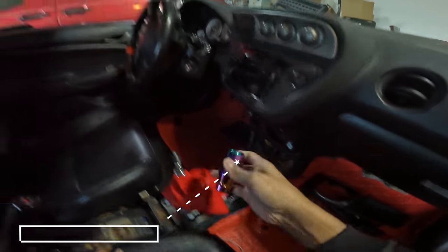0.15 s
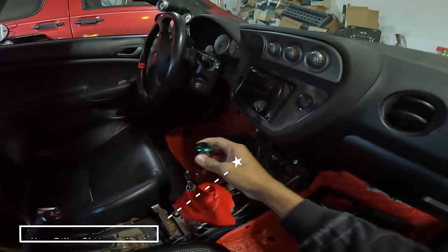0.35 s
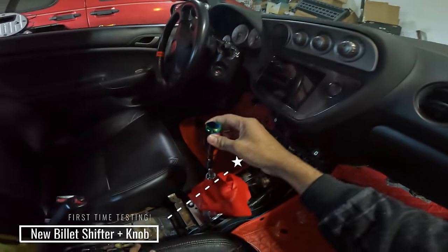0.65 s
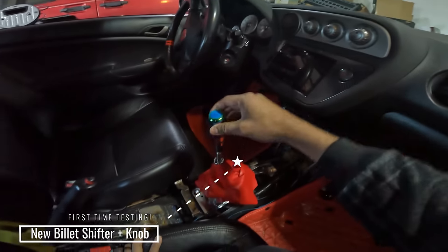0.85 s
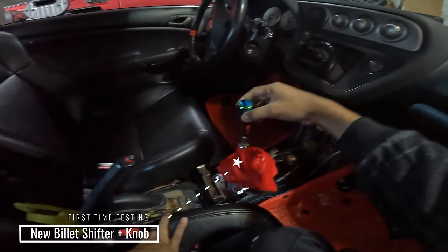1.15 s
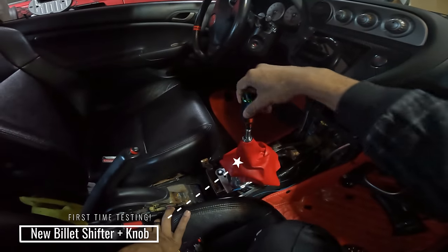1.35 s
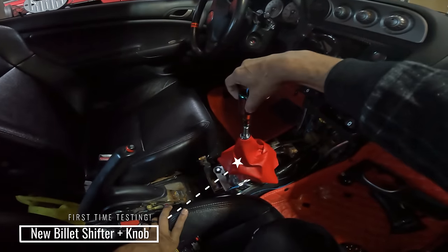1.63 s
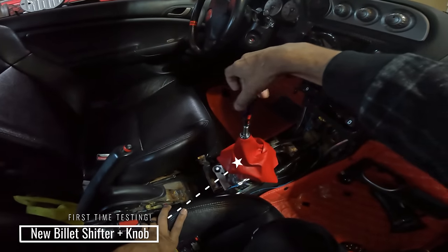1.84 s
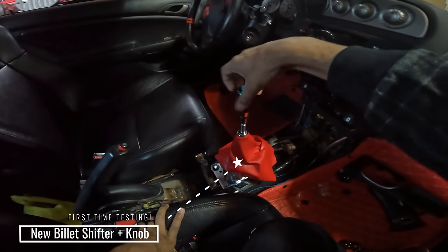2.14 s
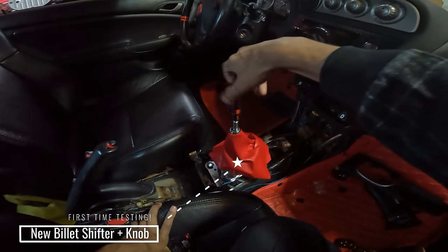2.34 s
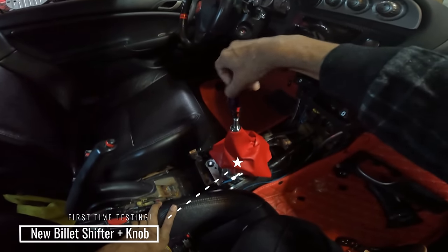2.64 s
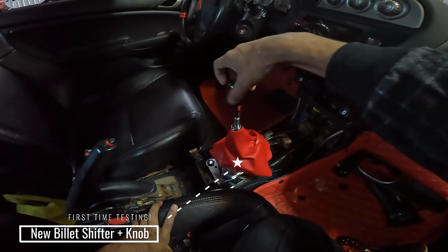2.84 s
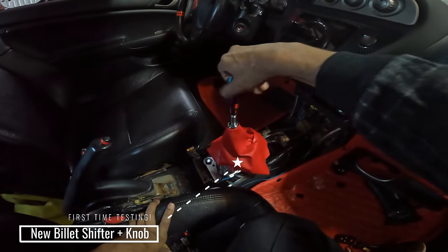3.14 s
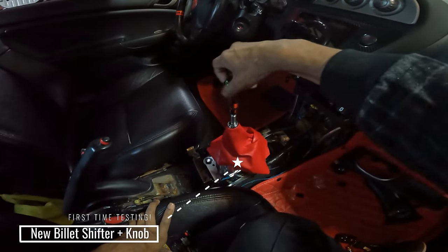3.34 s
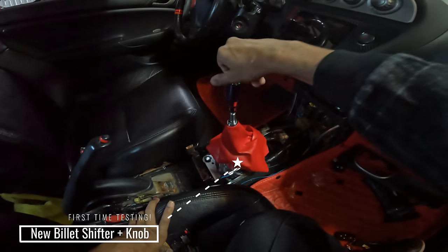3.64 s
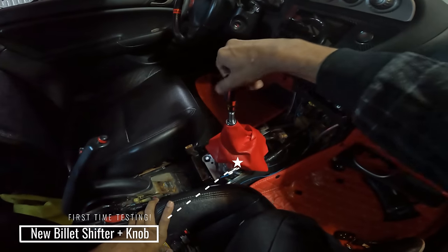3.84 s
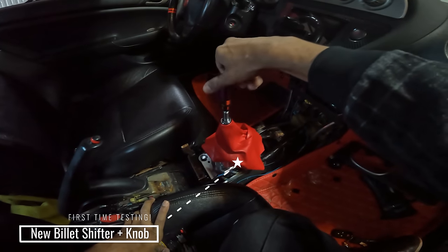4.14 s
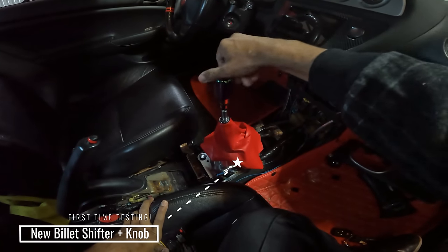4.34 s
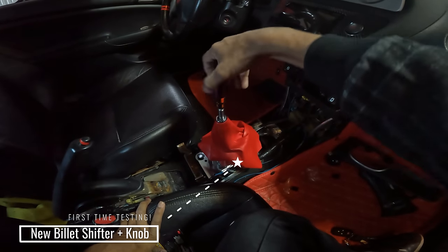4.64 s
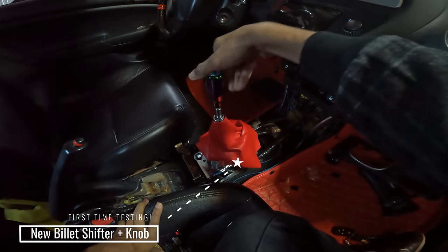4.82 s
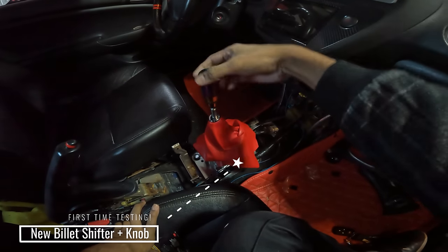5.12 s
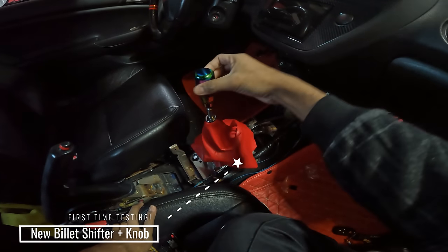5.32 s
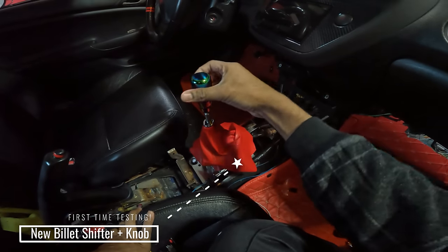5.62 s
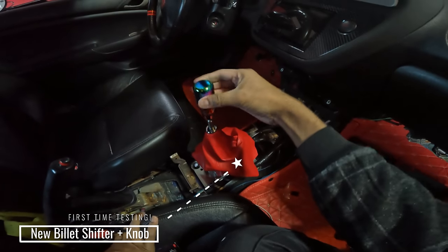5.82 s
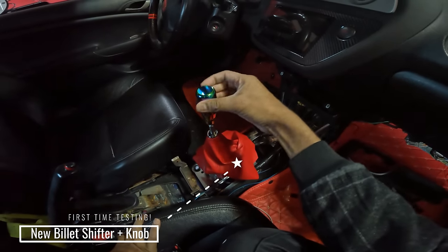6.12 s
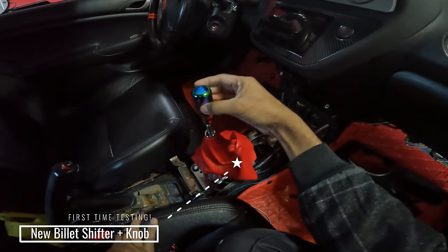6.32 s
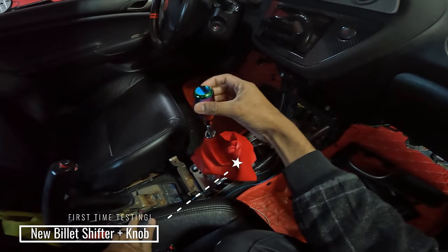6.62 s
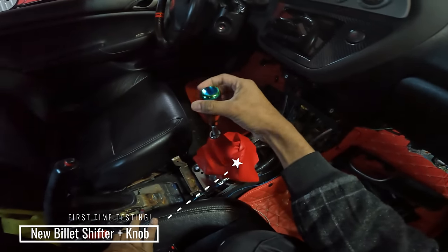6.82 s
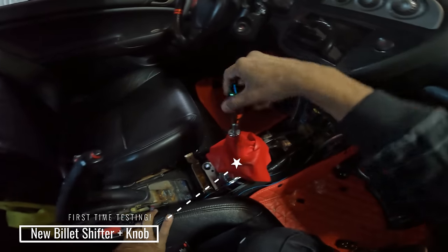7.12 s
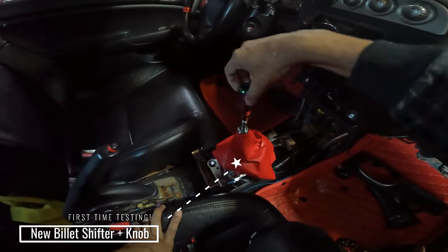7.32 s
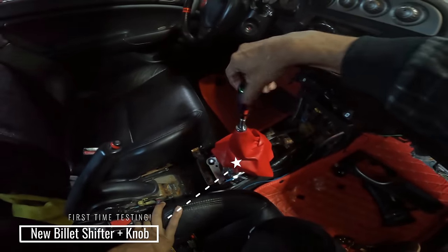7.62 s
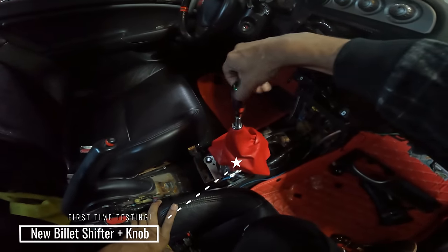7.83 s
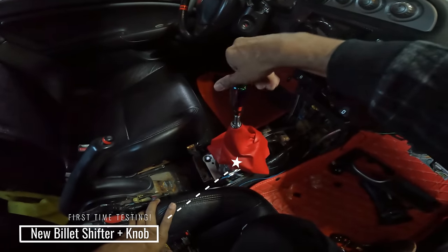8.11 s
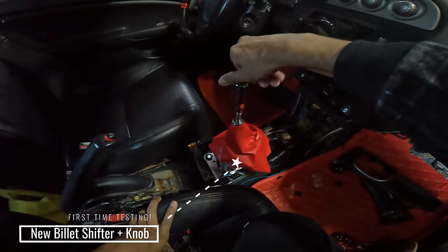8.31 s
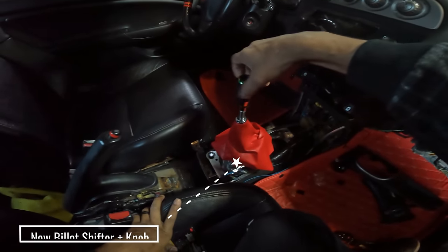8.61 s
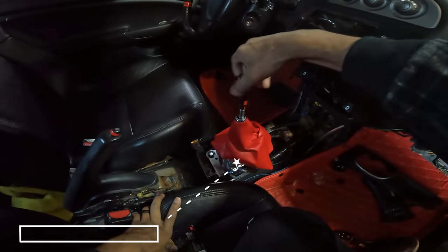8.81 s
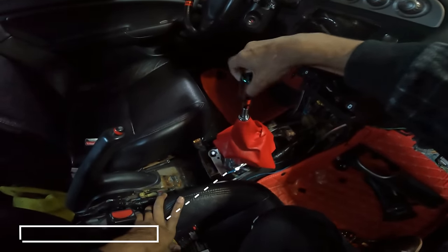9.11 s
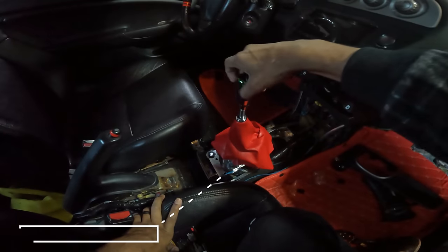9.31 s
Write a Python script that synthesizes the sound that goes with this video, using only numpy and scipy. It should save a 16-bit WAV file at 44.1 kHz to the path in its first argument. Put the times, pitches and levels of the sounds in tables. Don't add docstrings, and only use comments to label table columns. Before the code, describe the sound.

Close stereo pickup in a stripped car cabin, with soft low rumble, fluttering panel hum and steady hiss throughout. From 0.05 to 0.47 s a plastic case creaks under a finger at the far right, with one sharp tick left at 0.2. Light metal clacks begin at 0.5. The two loudest knocks come at 0.9 and 1.1 s, booming in the floor pan with bright jingling linkage and ringing rods. From 1.5 to 3.7 the lever rocks gently: dull quiet thuds, dry bearing rubs, sleeve brushing on the left. From 3.95 to 4.6 the knocks firm up, damped by the palm; from 4.8 to 6.9 come irregular gate clacks, strongest near 5.15, with small ticks and leather creases. Around 7.0 to 7.4 it quietens to cloth rustle. From 7.5 to 9.3 steady thumps arrive about five per second, each with a faint high bushing squeak, then rumble remains.

```python
import sys
import numpy as np
from scipy import signal
from scipy.fft import rfft, irfft, next_fast_len
from scipy.io import wavfile
from scipy.ndimage import uniform_filter1d

SR = 44100
rng = np.random.default_rng(int(sys.argv[2]) if len(sys.argv) > 2 else 0)


def invert_db(x):
    u = np.asarray(x, float) / 20
    return 10 ** u


def transcribe(signal):
    frames = np.atleast_2d(signal).T
    limited = np.clip(frames, -1, 1)
    pcm = np.round(limited * 32767).astype(np.int16)
    wavfile.write(sys.argv[1], SR, pcm)


N = 417186
PORT_LAG = 10


def resonance(x, hz, width):
    return signal.lfilter(*signal.iirpeak(hz, hz / width, fs=SR), x)


def decay(t, t60):
    return np.exp(-np.log(1000) * t / t60)


def ring(modes, chance, t):
    hz, db, t60 = np.transpose(modes)[:, :, None]
    chance = chance[:len(modes), None]
    strength = invert_db(db + 4 * chance)
    partials = np.sin(2 * np.pi * hz * (1 + 0.016 * chance) * t)
    return (strength * partials * decay(t, t60)).sum(0)


def wash(bands, noise, t):
    y = 0
    for hz, width, db, t60 in bands:
        band = resonance(resonance(noise * decay(t, t60), hz, width), hz, width)
        y = y + invert_db(db) * band * np.sqrt(500 / width)
    return y / np.abs(y).max()


def walk(rate):
    k = int(SR / rate)
    held = np.repeat(rng.standard_normal(N // k + 1), k)
    return 1.3 * uniform_filter1d(uniform_filter1d(held, k), k)[:N]


def fibres(strokes, bands, pan_db=0):
    power = np.zeros(N)
    for s, length, db in strokes:
        stroke = power[int((s - length / 4) * SR):int((s + length * 1.4) * SR)]
        stroke += 2 * invert_db(2 * db) * np.hanning(len(stroke)) ** 2
    grains = rng.standard_normal((2, N)) * invert_db(3.8 * np.minimum(rng.exponential(size=N), 6))
    x = 0
    for hz, width, db in bands:
        band = resonance(grains, hz, width)
        band = resonance(resonance(band, hz, 1.5 * width), hz, 1.5 * width)
        x = x + invert_db(db) * band
    left = 1 / (1 + invert_db(-2 * pan_db))
    ports = np.sqrt(2 * np.array([[left], [1 - left]]))
    soft = uniform_filter1d(np.sqrt(power), int(0.0027 * SR)) * ports
    return x / x.std() * soft * invert_db(1.5 * walk(25))


def add(out, s, wave, db, pan_db=0, lag=0):
    wave = wave * invert_db(db) / np.abs(wave).max()
    for row, gain_db, late in zip(out, (pan_db / 2, -pan_db / 2), (lag, 0)):
        i = int(s * SR) + late
        n = min(len(wave), N - i)
        row[i:i + n] += wave[:n] * invert_db(gain_db)


PAN_HZ, TUNNEL_HZ = (133.2, 150.04), (365.6, 389.6)
# f/Hz, level/dB per Hz
CABIN = [(80, -8), (156, 6.5), (249, -6.5), (373, -9), (452, -28), (1800, -80), (2580, -33), (15000, -28.5)]
# f/Hz, side minus mid level/dB
CABIN_SIDE = [(100, -7), (300, -4.5), (700, 4), (15000, 0)]
# t/s, rumble level/dB
STIR = [(0, -53), (.78, -58.5), (1.1, -52.5), (1.6, -55), (1.9, -53), (2.9, -51), (3.4, -52), (4.6, -47.5),
        (4.9, -55), (5.1, -50.5), (5.9, -52), (6.6, -50.5), (7.0, -56.5), (7.3, -49.5), (7.7, -54),
        (8.25, -48.5), (8.7, -51.5), (9.46, -51)]
# f/Hz, width/Hz, level/dB
RUMBLE = [(27.4, 35, 3), (42.5, 21.7, 1), (65.1, 20.5, -5), (85.7, 16, -11)]
# f/Hz, width/Hz, level/dB, t60/s
SHELL = [(290, 45, 1.5, 0.31), (402, 330, 2, 0.11), (714, 500, 5.5, 0.022), (585, 280, -18.5, 0.61)]
# f/Hz, width/Hz, level/dB, t60/s
SHELL_MID = [(1290, 1460, -9, 0.022), (1440, 1900, -22.5, 0.015), (1215, 270, -37.5, 0.42)]


def cabin(knocks):
    t = np.arange(N) / SR
    rest = invert_db(-10 * uniform_filter1d(1. * (t > 7.0) * (t < 8.2), SR // 10))

    size = next_fast_len(N)
    hz = np.maximum(np.arange(size // 2 + 1) * SR / size, 1)
    colour, side = (np.interp(np.log(hz), np.log(np.array(p)[:, 0]), np.array(p)[:, 1])
                    for p in (CABIN, CABIN_SIDE))
    spectra = rfft(rng.standard_normal((2, size))) * invert_db(np.array([colour, colour + side]))
    mid, dif = irfft(spectra, size)[:, :N]
    hiss = invert_db(-64.5 + .5 * walk(3.3)) * np.array([mid + dif, mid - dif]) / mid.std()
    lows = signal.sosfilt(signal.butter(2, 450, fs=SR, output="sos"), hiss)
    hiss = hiss + (rest - 1) * lows

    air, shake = rng.standard_normal((2, 3, N))
    air = air[0] + 0.25 * air[1:]
    air = sum(invert_db(g) * resonance(resonance(air, f, w), f, w) for f, w, g in RUMBLE)
    rumble_db = np.interp(t, *np.transpose(STIR)) + 1.4 * walk(11)
    rumble = air / air.std() * invert_db(rumble_db + np.array([[.8], [-.8]]))

    pan = invert_db(10.0) * resonance(shake[0], PAN_HZ[1], 33.0)
    tunnel = invert_db(4.0) * resonance(shake[0], TUNNEL_HZ[0], 5.5)
    panels = rest * (pan + tunnel)
    shell = sum(invert_db(g - 18.0) * resonance(shake[1:], f, w) for f, w, g, _ in SHELL + SHELL_MID)
    tremble = shell + np.array([np.roll(panels, PORT_LAG) * invert_db(-1.5), panels])
    span = int(0.06 * SR)
    work = uniform_filter1d(uniform_filter1d(np.abs(knocks[0]), span), span)
    effort = (np.abs(work) / invert_db(-41.0) + 0.8) ** 0.55
    flutter = invert_db(1.8 * walk(14))
    return hiss + rumble + tremble * invert_db(-66 + 19) * effort * flutter


# t/s, peak level/dB, main ring f/Hz
CREAKS = [(0.066, -53.5, 2560), (0.11, -48, 2740), (0.149, -56, 2580), (0.2762, -41, 2530),
          (0.288, -42, 2440), (0.316, -48.5, 2480), (0.3611, -36.5, 2350), (0.3702, -32, 2350),
          (0.3777, -33, 2260), (0.3889, -34, 2350), (0.4384, -31, 2240), (0.4457, -30.5, 2370),
          (0.4508, -52, 2350), (0.453, -31.5, 2320), (0.4664, -37, 2400)]
# f/Hz, level/dB, t60/s
CASE = [(1610, 4, 0.0088), (2160, 11.5, 0.0062), (2350, 20, 0.0042), (3320, 7.5, 0.0049),
        (5440, 13.5, 0.0013), (229, 0.5, 0.012)]


def creaks():
    out, t = np.zeros((2, N)), np.arange(SR // 30) / SR
    pan_db = -53
    for (s, db, hz), c in zip(CREAKS, rng.standard_normal((len(CREAKS), len(CASE)))):
        case = [(hz if k == 2 else f, g, t60) for k, (f, g, t60) in enumerate(CASE)]
        slip = -ring(case, 0.14 * c, t) * (1 - np.exp(-t / 0.0029))
        slip = slip - 0.13 * resonance(slip, 1980, 87)
        add(out, s, slip, db + 7.5 + pan_db / 2, pan_db)
    return out


RATTLE_S, SCRAPE_S = 0.0044, 0.011
LIGHT_TREBLE_DB, GRIPPED_TREBLE_DB = -12, -8
# t/s, peak level/dB, rods re peak/dB
SCRAPED_CLACKS = [(0.07, -55.5, -6), (0.19, -64, 10), (2.15, -66, -16), (3.45, -67, -6), (5.2, -60, -3),
                  (7.62, -62, -19), (8.143, -49.5, -11), (8.333, -55, -23), (8.558, -53, -9),
                  (8.81, -55.5, -13), (8.978, -58, -18.5), (9.264, -52.5, -0.5)]
# t/s, peak level/dB, rods re peak/dB
LIGHT_CLACKS = [(0.518, -45, -14), (0.536, -54.5, 10.5), (0.582, -43.5, -34), (0.637, -53.5, 7),
                (0.682, -51, -5), (0.8997, -31, 0.5), (1.072, -48.5, 12), (1.086, -38.5, -8),
                (1.107, -37, 6.5), (1.1145, -31, 7), (1.783, -65, 9), (1.821, -56, 6.5), (2.06, -54.5, -20),
                (2.104, -50, -24), (2.36, -54.5, -2), (2.553, -54.5, -14), (2.778, -56, 8),
                (2.942, -62, -17), (3.04, -58.5, -7.5), (3.235, -55.5, -14), (3.651, -61, -13),
                (1.985, -58, -19), (2.71, -58, -8), (3.12, -62, -16), (3.42, -62, -10)]
# t/s, peak level/dB, rods re peak/dB
GRIPPED_CLACKS = [(3.954, -47, -30), (3.983, -45.5, -24), (4.182, -53.5, -24), (4.366, -49, -28),
                  (4.576, -47.5, -13), (4.8, -51, -2), (5.0, -54, 3), (5.144, -40.5, -7), (5.43, -53, -3),
                  (5.612, -55.5, -8), (5.728, -51.5, -6), (5.879, -58, -22), (5.928, -47, -19),
                  (6.389, -47, 3), (6.526, -50, -15), (6.625, -54.5, 2), (6.866, -43.5, -32),
                  (7.411, -62, 6), (7.451, -57, -5), (7.54, -52, -14), (7.772, -51, -1),
                  (7.779, -43.5, -13.5), (7.948, -47.5, -15), (8.11, -52.5, -23)]
# f/Hz, level/dB, t60/s
LINKAGE = [(921, -4, .06), (1023, 0, .07), (1130, -4, .06), (1281, -3, .06), (1570, -3, .05),
           (1950, -4, .05)]
# f/Hz, width/Hz, level/dB, t60/s
LINKAGE_TOP = [(2340, 1180, 16.5, 0.06), (3330, 440, 7, 0.12), (5500, 6800, 11, 0.06),
               (8500, 460, -37, 0.0063), (11100, 7200, -41, 0.01)]


def clacks(rows, treble_db, rattle):
    out, t = np.zeros((2, N)), np.arange(SR // 5) / SR
    for (s, db, rods_db), c in zip(rows, rng.standard_normal((len(rows), 4, len(t)))):
        age = t[:4000] / rattle
        contacts = c[0, :4000] ** 3 * np.exp(-age) * np.sqrt(age)
        contacts[0] = 16 * RATTLE_S / rattle * invert_db(min(0.55 * (db + 53), 0))
        for ch, port_db in enumerate((-1.1, 1.1)):
            noise = c[1 + ch] + .5 * c[3]
            low = wash(SHELL[1:], noise, t)
            middle = wash(SHELL_MID, noise, t) + invert_db(-18) * ring(LINKAGE, .6 * c[3, 9:], t)
            top = wash(LINKAGE_TOP, noise, t)
            bodies = ((low, 4.0 + port_db), (middle, rods_db + 2.0 + port_db),
                      (top, treble_db + rods_db + 1.0 - port_db))
            for body, gain_db in bodies:
                add(out[ch:ch + 1], s, signal.fftconvolve(contacts, body), db + gain_db)
    return out


# t/s, length/s, level/dB
RUBS = [(0.12, 0.079, -61.5), (0.19, 0.022, -69), (1.08, 0.051, -45.5), (1.13, 0.077, -58),
        (1.25, 0.29, -67.5), (1.78, 0.049, -64), (2.06, 0.061, -63.5), (2.3, 0.085, -63.5),
        (2.54, 0.065, -63.5), (2.77, 0.063, -63.5), (3.02, 0.039, -63.5), (3.23, 0.062, -62.5),
        (3.43, 0.06, -67), (3.925, 0.035, -59.5), (4.15, 0.12, -65.5), (5.2, 0.4, -63.5),
        (6.13, 0.13, -65.5), (6.63, 0.094, -66.5), (4.36, 0.046, -63), (4.55, 0.057, -62),
        (4.79, 0.06, -59.5), (0.9, 0.039, -45.5), (7.74, 0.064, -56.5), (7.96, 0.033, -63.5),
        (8.15, 0.069, -71), (8.33, 0.092, -66.5), (8.55, 0.061, -64.5), (8.79, 0.055, -64.5),
        (8.97, 0.044, -64.5), (9.26, 0.05, -69)]
# f/Hz, width/Hz, level/dB
BEARING = [(290, 126, 11.5), (634, 325, 5), (980, 470, 2), (1740, 1480, -5.5)]


def rubs():
    return fibres(RUBS, BEARING, -2.2)


# t/s, length/s, level/dB
SLEEVE = [(0.786, 0.1, -64), (0.95, 0.33, -72), (1.607, 0.14, -69.5), (1.902, 0.031, -72.5),
          (1.961, 0.04, -66), (2.079, 0.05, -63), (2.203, 0.072, -63.5), (2.273, 0.079, -59.5),
          (2.357, 0.05, -70), (2.447, 0.044, -68), (2.568, 0.071, -67), (2.662, 0.021, -70),
          (2.809, 0.043, -66.5), (3.09, 0.036, -71.5), (3.152, 0.016, -70), (3.315, 0.023, -70),
          (3.52, 0.039, -73.5), (3.63, 0.037, -71.5), (3.876, 0.036, -76), (4.003, 0.031, -69),
          (4.435, 0.034, -70), (4.735, 0.27, -75.5), (5.122, 0.17, -71), (5.275, 0.073, -67),
          (5.344, 0.36, -74), (5.687, 0.29, -72.5), (5.882, 0.22, -71.5), (6.1, 0.2, -75.5),
          (6.693, 0.089, -73), (7.024, 0.13, -68), (9.436, 0.03, -69.5)]
# t/s, length/s, cloth level/dB, bright hiss level/dB
BOOT = [(0.181, 0.029, -70, -63), (0.4, 0.12, -75, -73), (1.117, 0.16, -69.5, -72),
        (1.294, 0.22, -74, -75.5), (1.419, 0.19, -76, -74), (1.803, 0.036, -69, -72.5),
        (2.708, 0.11, -77, -81), (3.23, 0.033, -85, -75), (3.69, 0.038, -86, -75), (4.16, 0.039, -83, -74),
        (4.37, 0.026, -88, -77), (6.242, 0.034, -71, -77), (6.464, 0.029, -76, -70.5),
        (7.118, 0.25, -73.5, -75.5), (7.21, 0.05, -88, -74), (7.367, 0.21, -79, -77.5)]
# t/s, level/dB
BUSHING = [
    (7.75, -82),
    (7.942, -72.5),
    (8.142, -73),
    (8.345, -77),
    (8.549, -71),
    (8.785, -71.5),
    (8.986, -67),
    (9.22, -72),
]
# f/Hz, width/Hz, level/dB
CLOTH = [(2550, 530, 9.5), (3570, 1270, 7.5), (4104, 990, -1), (1360, 4300, -13)]
# f/Hz, width/Hz, level/dB
SLEEVE_EDGE = [(9430, 2300, 0)]
# f/Hz, width/Hz, level/dB
EDGE = [(8700, 2600, -13), (10100, 9000, -2)]
# f/Hz, width/Hz, level/dB
SQUEAK = [(8330, 290, 1), (9300, 2500, 1.5)]


def rustle():
    pan_db = 31
    sleeve = fibres(SLEEVE, CLOTH, pan_db) + invert_db(-11) * fibres(SLEEVE, SLEEVE_EDGE, pan_db)
    folds = np.array(BOOT)
    boot = fibres(folds[:, :3], CLOTH) + fibres(folds[:, [0, 1, 3]], EDGE)
    bushing = fibres([(s, 0.04, db) for s, db in BUSHING], SQUEAK)
    return sleeve + boot + bushing


# t/s, peak level/dB, centre f/Hz, left minus right level/dB
TICKS = [(0.2176, -28.5, 9300, 20), (0.481, -54, 7140, -27), (0.5316, -55, 8240, 19),
         (0.6402, -50.5, 8200, 4), (1.389, -57, 6440, 16), (1.462, -50, 6500, 12), (1.6143, -56, 10200, 11),
         (2.332, -48, 9390, 18), (4.7112, -57, 7210, 5), (4.807, -53, 9150, -1.5), (4.923, -50, 9690, -12),
         (5.001, -59, 6050, 16), (6.401, -49, 11000, -0.6), (6.4724, -51, 12900, -4),
         (6.8535, -46, 8500, -1.5), (6.886, -49, 11100, -5), (7.701, -56, 9150, 2.5)]


def ticks():
    out, t = np.zeros((2, N)), np.arange(SR // 12) / SR
    for (s, db, hz, pan_db), c in zip(TICKS, rng.standard_normal((len(TICKS), len(t)))):
        t60 = 0.011 * invert_db(-0.86 * (db + 47.5))
        snap = c * decay(t, t60)
        wide = invert_db(8.5) * resonance(snap, 4600, 2200) + resonance(snap, 8500, 8100)
        tick = resonance(snap, hz, 0.12 * hz) + 0.2 * wide
        add(out, s, tick, db - abs(pan_db) / 8, pan_db, lag=PORT_LAG)
    return out


# t/s, length/s, level/dB
WHISPER = [
    (3.23, .035, -75),
    (3.455, .025, -77),
    (3.69, 0.037, -74),
    (4.155, .04, -78),
    (4.81, .03, -76),
    (6.24, .04, -78),
    (7.22, .05, -74),
    (9.22, .05, -73),
]
# f/Hz, width/Hz, level/dB
LEATHER = [(13000, 3800, 0)]
# t/s, level/dB
WHINES = [
    (7.73, -76),
    (7.945, -86),
    (8.13, -77),
    (8.345, -79),
    (8.541, -77),
]


def whispers():
    leather = fibres(WHISPER, LEATHER)
    whine = fibres([(s, 0.068, db) for s, db in WHINES], [(8200, 260, 0)])
    finger = fibres([(0.24, .27, -69.5)], [(1970, 3300, 5), (4850, 11000, -1.5)], -26)
    return leather + whine + finger


# t/s, floor pan peak level/dB, tunnel re pan/dB
GATE_THUMPS = [(0.517, -42.5, -13), (0.587, -36.5, -6), (0.902, -21, -7), (0.975, -37.5, -11),
               (1.119, -24, -11), (1.181, -40.5, -1), (4.801, -34, -11), (5.072, -39.5, -18),
               (5.147, -33.5, -1), (5.431, -42.5, -34), (5.618, -40, -14.5), (5.729, -44, -11),
               (5.926, -40.5, -6), (6.224, -39.5, -19), (6.395, -38.5, 2), (6.482, -44, -16),
               (6.647, -33, -15), (6.872, -41, -2.5), (1.076, -34.5, -1.5), (6.537, -44.5, -14),
               (1.5, -57.5, 1.5)]
# t/s, floor pan peak level/dB, tunnel re pan/dB
ROCK_THUMPS = [(1.8, -48.5, -5), (1.99, -46.5, -16), (2.099, -42.5, -5.5), (2.363, -47, -15),
               (2.525, -41.5, -22), (2.559, -38.5, -13), (2.765, -44, -15), (2.846, -40, -18),
               (2.991, -44, -11), (3.238, -38.5, -12), (3.427, -47.5, -8), (3.49, -35.5, -26),
               (3.652, -41, -9.5), (3.98, -36, -14), (4.18, -47, -7), (4.373, -39, -8.5),
               (4.53, -41.5, -13), (7.539, -42.5, -9), (7.705, -40.5, -13), (7.778, -34.5, -11.5),
               (7.954, -33.5, -22), (8.145, -31, -18.5), (8.342, -37.5, -15), (8.403, -38.5, -33),
               (8.561, -35.5, -22), (8.645, -44.5, -17.5), (8.807, -42.5, -8), (8.987, -32.5, -23),
               (9.264, -45, -8.5)]


def thumps(rows, soft_t60, push):
    out, t = np.zeros((2, N)), np.arange(SR // 2) / SR
    for (s, db, tunnel_db), c in zip(rows, rng.standard_normal((len(rows), 6))):
        t60 = soft_t60 * invert_db(-0.27 * max(db + 31, 0))
        swell = np.sign(c[5]) * np.sin(np.pi / 2 * np.minimum(t / push, 1)) ** 2
        pan = [(PAN_HZ[0], -5, t60), (PAN_HZ[1], 0, t60), (70, -14, .15), (100, -14, .1), (235, -16, .08)]
        tunnel = [(TUNNEL_HZ[0], 0, .13), (TUNNEL_HZ[1], -9, .1), (300, -11, .07), (464, -14, .07)]
        add(out, s - 0.322 * push, swell * ring(pan, 0.97 * c, t), db, -.8, lag=PORT_LAG)
        add(out, s - 0.207 * push, swell * ring(tunnel, .5 * c[2:], t), db + tunnel_db, -3.5, lag=PORT_LAG)
    return out


# t/s, peak level/dB, f/Hz
RODS = [(0.903, -26.5, 1020), (4.182, -49, 965), (5.001, -46.5, 453), (5.432, -44, 815), (5.612, -48, 760),
        (5.729, -48, 800), (6.525, -46.5, 980), (6.866, -41, 677), (0.517, -46.5, 860), (0.533, -50, 1590),
        (0.536, -43, 980), (0.56, -52, 1600), (0.558, -45.5, 2550), (0.586, -44, 1060), (0.601, -46, 1060),
        (0.64, -58, 2670), (0.645, -61, 1620), (0.685, -51, 1570), (0.8998, -34, 680), (0.914, -34, 1394),
        (1.087, -37, 1510), (1.116, -39, 920), (1.113, -30, 1550),
        (0.9005, -32, 1500), (1.073, -42.5, 1250), (1.1204, -35, 1300), (3.953, -44, 1510),
              (3.9813, -47, 1260), (4.797, -53, 1610), (5.1425, -39, 1230), (6.3945, -51, 1990),
              (6.523, -45, 1610), (6.868, -47, 1590), (7.4121, -52, 1880), (7.778, -49, 1360),
              (7.9497, -40, 1890)]


def rods():
    out, t = np.zeros((2, N)), np.arange(SR // 8) / SR
    for s, db, hz in RODS:
        t60 = 0.022 * invert_db(0.65 * (db + 48))
        tone = ring([(hz, 0, t60)], np.zeros(1), t) * (1 - np.exp(-t / 0.00033))
        add(out, s, tone, db - 0.5, -3, lag=PORT_LAG)
    return out


# t/s, peak level/dB, tilt/dB per octave
SHAFT_BLOWS = [(0.53, -45.5, 12), (0.584, -53, 5), (0.64, -47.5, 22), (0.683, -62, -10), (0.8995, -38.5, 2),
               (1.108, -41, -8), (2.08, -53, -5), (2.94, -57.5, -4), (3.238, -56, -6), (3.954, -43.5, -6),
               (3.984, -43.5, -3.5), (4.368, -49.5, -7), (4.577, -51.5, -13), (4.798, -51, -4),
               (5.143, -40.5, 3), (5.878, -57, -12), (5.927, -45.5, -14), (6.135, -55, -8),
               (6.393, -54, -3), (6.867, -42.5, -1), (7.778, -50, 3), (7.949, -44.5, 0), (8.111, -54, -9),
               (8.145, -53, -7), (8.19, -53.5, -18), (8.56, -52, -11), (8.8, -50.5, -8), (8.975, -52, -8)]
# f/Hz, level/dB, t60/s
SHAFT = [(611, 1, 0.039), (1000, -3.5, 0.031), (1258, -15.5, 0.14), (1590, 1.5, 0.038), (1980, -4.5, 0.04)]


def shaft():
    out, t = np.zeros((2, N)), np.arange(SR // 12) / SR
    for (s, db, tilt_db), c in zip(SHAFT_BLOWS, rng.standard_normal((len(SHAFT_BLOWS), len(SHAFT)))):
        chord = [(f, g + tilt_db * np.log2(f / 1000), t60) for f, g, t60 in SHAFT]
        blow = ring(chord, 0.26 * c, t) * (1 - np.exp(-t / 0.0038))
        add(out, s, blow, db, -2.5, lag=PORT_LAG // 2)
    return out


# t/s, peak level/dB, f/Hz, t60/s
NUDGES = [(0.902, -28.5, 116.4, 0.15), (0.9, -41, 66, 0.072), (1.899, -58, 369, 0.22),
          (1.76, -55.5, 364, 0.13), (2.31, -53, 371, 0.094), (3.1, -55, 376, 0.17), (0.602, -43, 147, 0.11),
          (0.618, -56, 148, 0.12), (1.122, -28, 368, 0.16), (1.199, -47.5, 361, 0.28),
          (2.072, -54, 378, .12), (2.17, -50.5, 361, 0.15), (2.262, -56.5, 364, 0.17),
          (2.94, -56, 278, .08), (3.954, -43, 343, 0.06), (3.966, -39, 151, 0.06),
          (3.999, -37.5, 147, 0.12), (4.163, -59, 352, 0.13), (4.2, -55.5, 364, 0.25),
          (5.161, -46, 147, 0.13), (5.211, -50.5, 362, 0.13), (5.622, -38.5, 147, 0.066),
          (5.879, -48, 366, 0.15), (5.959, -41, 148, 0.089), (6.077, -57, 369, 0.091),
          (6.282, -52.5, 347, 0.088), (7.637, -50.5, 368, 0.12), (7.8, -45, 356, 0.11),
          (7.975, -48.5, 375, 0.28), (8.113, -49.5, 359, 0.086), (8.128, -34.5, 144, 0.17),
          (8.17, -39.5, 149.4, 0.14), (8.203, -52.5, 368, .15), (8.2, -40.5, 128, 0.18),
          (8.37, -56, 371, 0.14), (8.537, -52, 371, 0.17), (8.596, -53, 347, 0.12), (8.79, -50, 377, 0.26),
          (8.831, -41.5, 146, 0.16), (8.976, -52.5, 361, .15), (9.16, -51.5, 149.7, 0.14),
          (9.299, -42.5, 146.3, 0.17)]


def nudges():
    out, t = np.zeros((2, N)), np.arange(SR // 3) / SR
    for s, db, hz, t60 in NUDGES:
        swell = np.minimum(t * hz / 1.34, 1)
        add(out, s, ring([(hz, 0, t60)], np.zeros(1), t) * swell, db, -2.2, lag=PORT_LAG)
    return out


def scene():
    knocks = clacks(SCRAPED_CLACKS, GRIPPED_TREBLE_DB, SCRAPE_S)
    knocks = knocks + clacks(LIGHT_CLACKS, LIGHT_TREBLE_DB, RATTLE_S)
    knocks = knocks + clacks(GRIPPED_CLACKS, GRIPPED_TREBLE_DB, RATTLE_S)
    knocks = knocks + thumps(GATE_THUMPS, soft_t60=0.18, push=0.01623)
    knocks = knocks + thumps(ROCK_THUMPS, soft_t60=0.14, push=0.0227)
    lever = knocks + rubs() + ticks() + rods() + shaft() + nudges()
    return cabin(knocks) + creaks() + lever + rustle() + whispers()


def low_pass(x):
    return signal.sosfilt(signal.butter(12, 16440, fs=SR, output="sos"), x)


def record(dry):
    top_cut = signal.ellip(10, .2, 80, 15620, fs=SR, output="sos")
    mix = signal.sosfilt(top_cut, dry)
    return low_pass(mix)


dry = scene()
out = record(dry)
transcribe(out)
```